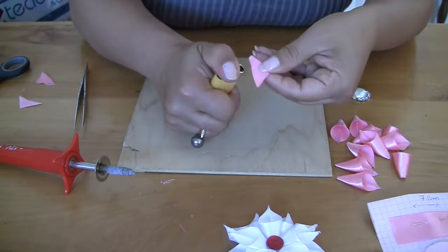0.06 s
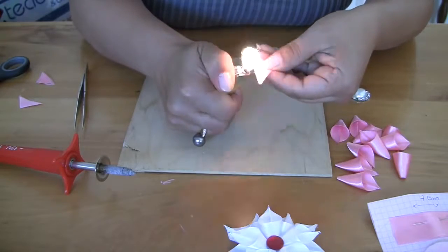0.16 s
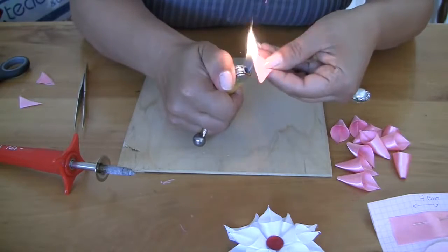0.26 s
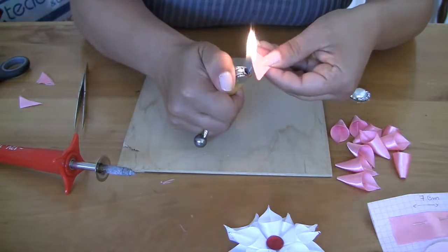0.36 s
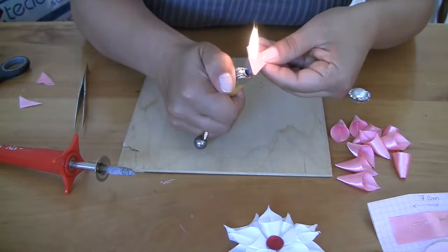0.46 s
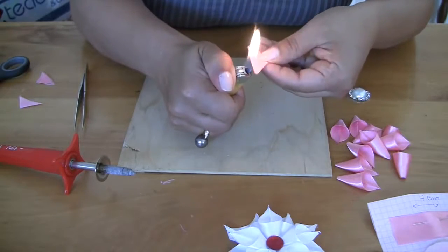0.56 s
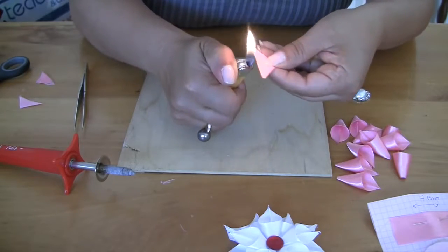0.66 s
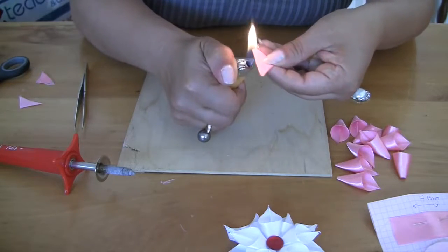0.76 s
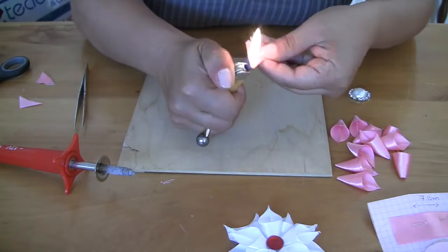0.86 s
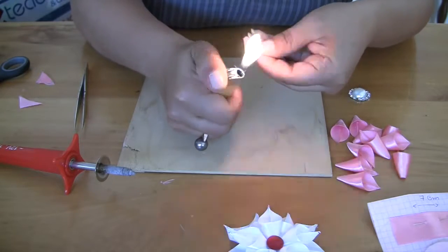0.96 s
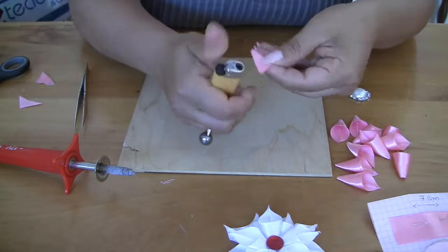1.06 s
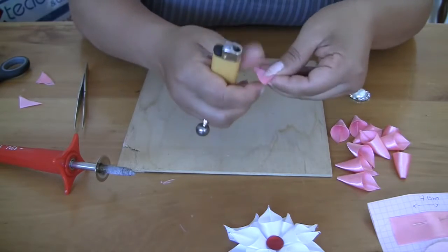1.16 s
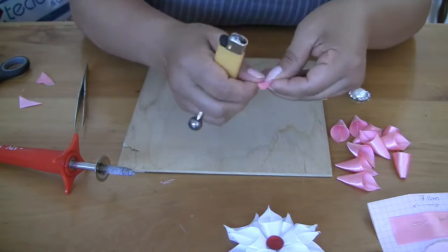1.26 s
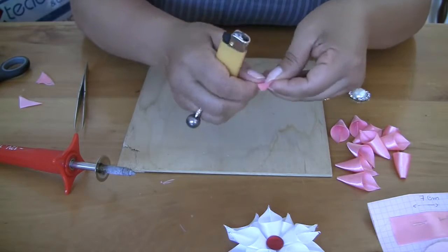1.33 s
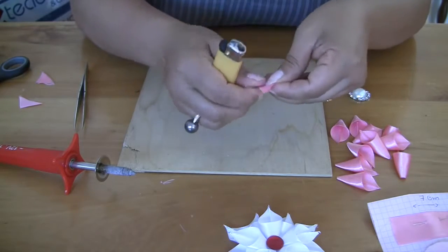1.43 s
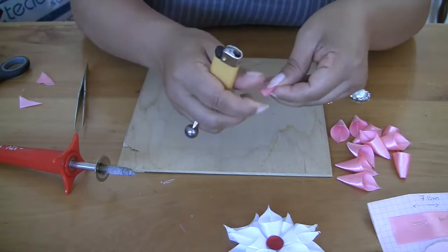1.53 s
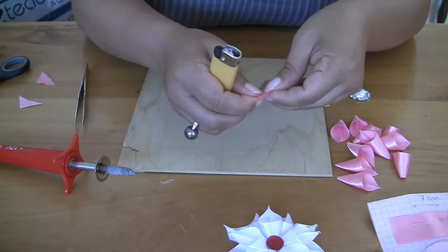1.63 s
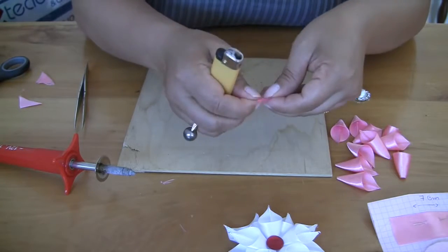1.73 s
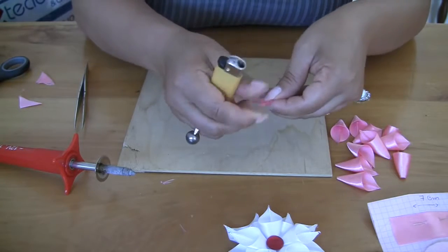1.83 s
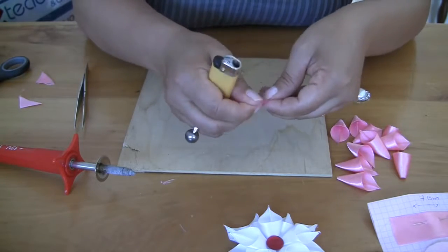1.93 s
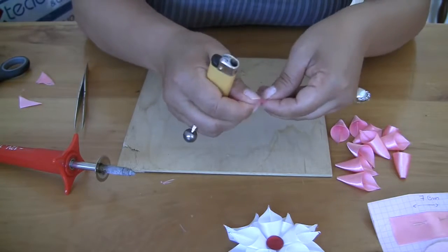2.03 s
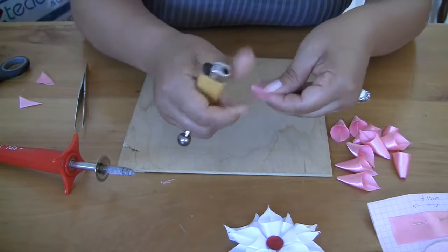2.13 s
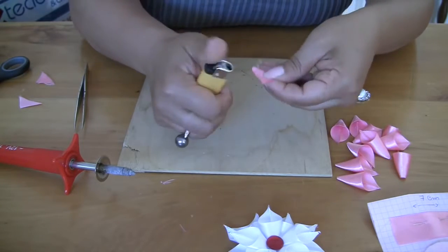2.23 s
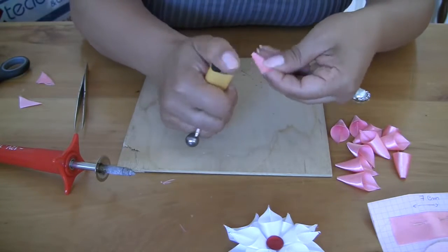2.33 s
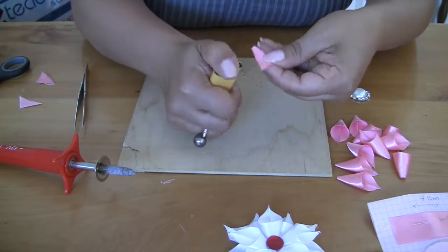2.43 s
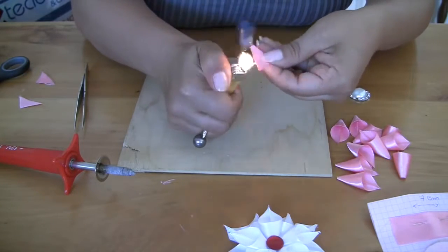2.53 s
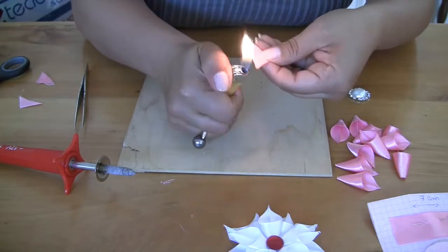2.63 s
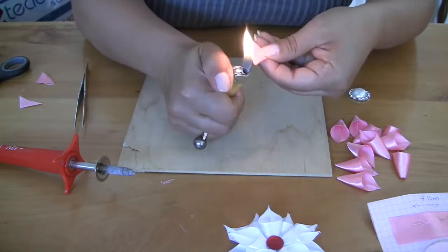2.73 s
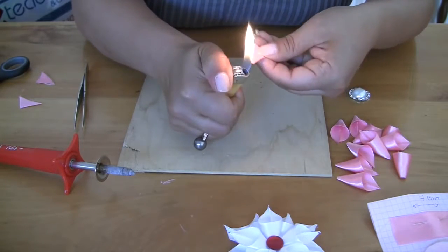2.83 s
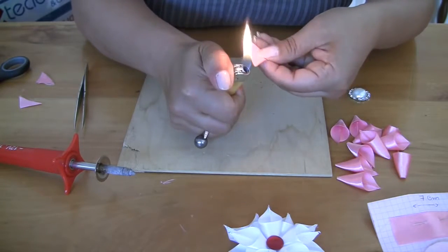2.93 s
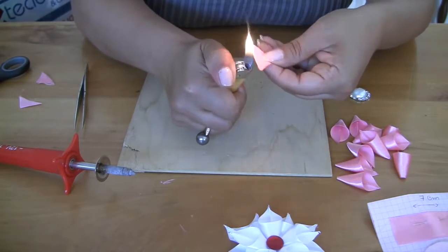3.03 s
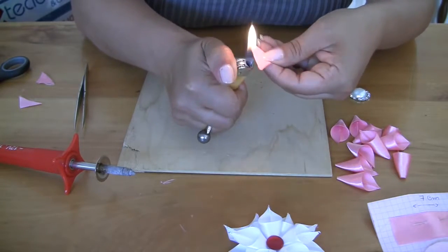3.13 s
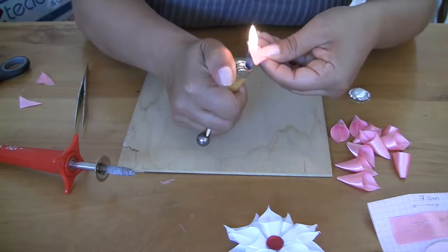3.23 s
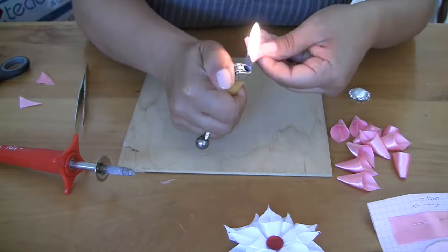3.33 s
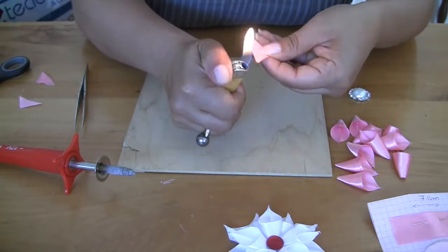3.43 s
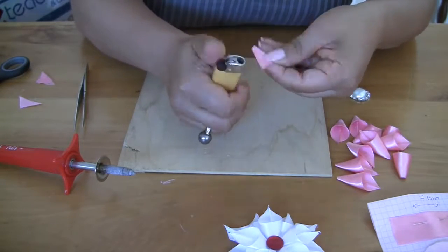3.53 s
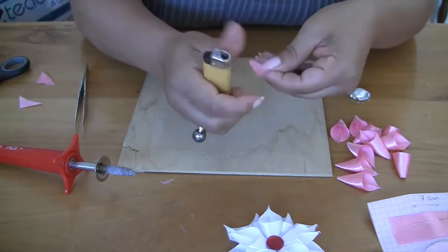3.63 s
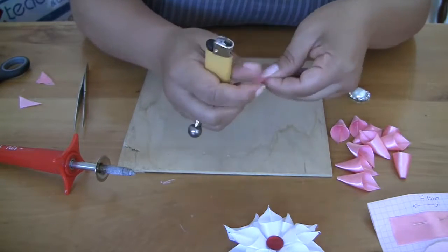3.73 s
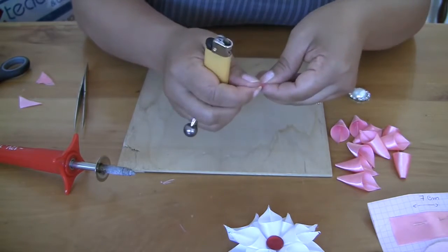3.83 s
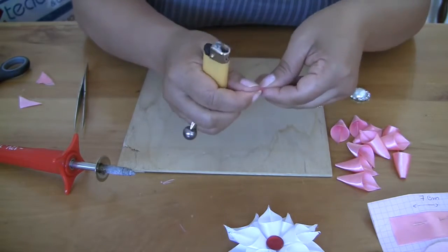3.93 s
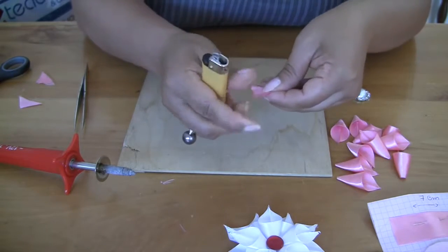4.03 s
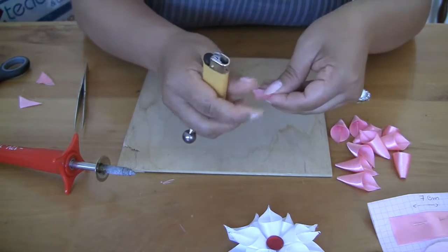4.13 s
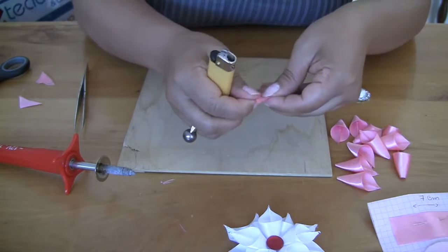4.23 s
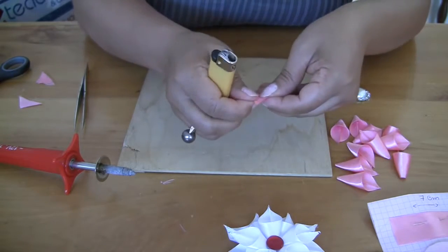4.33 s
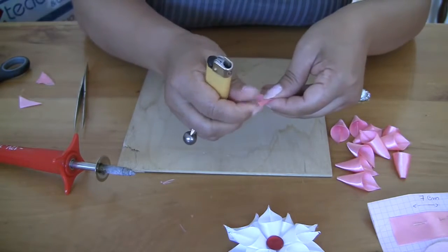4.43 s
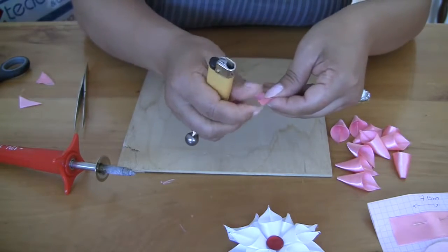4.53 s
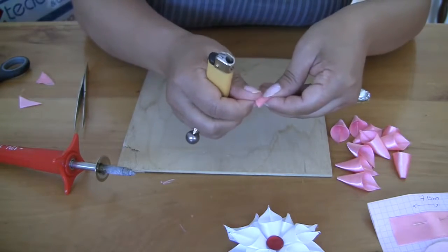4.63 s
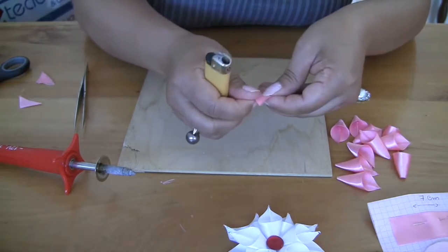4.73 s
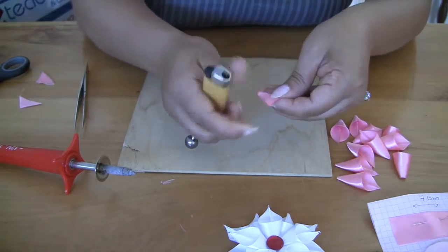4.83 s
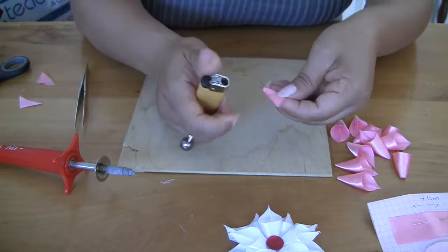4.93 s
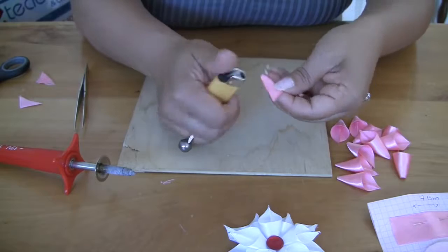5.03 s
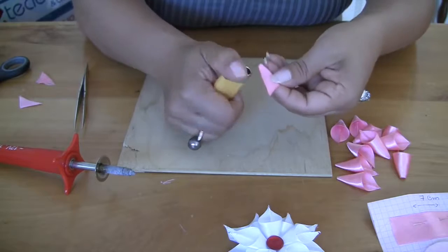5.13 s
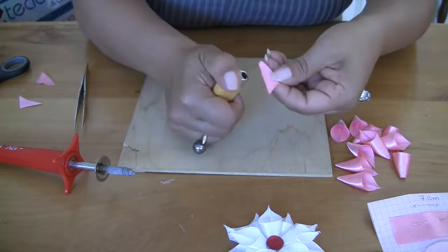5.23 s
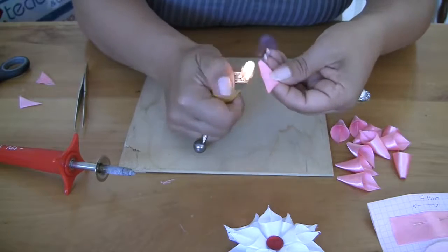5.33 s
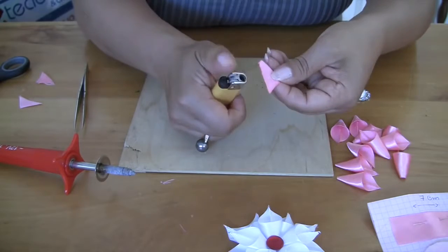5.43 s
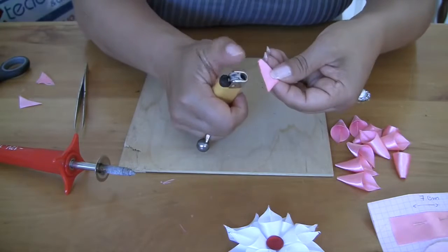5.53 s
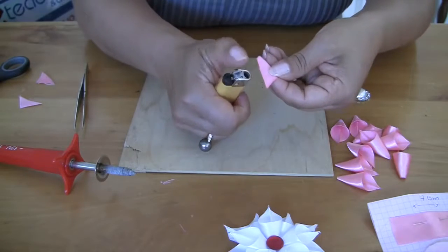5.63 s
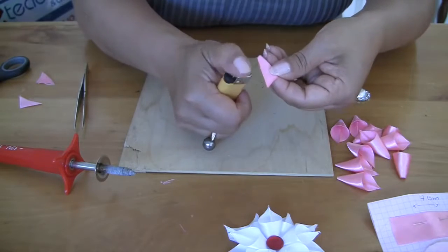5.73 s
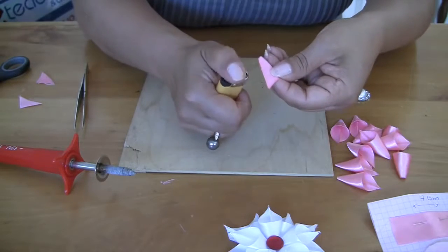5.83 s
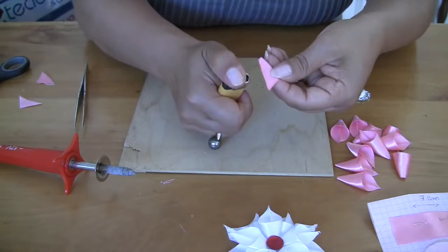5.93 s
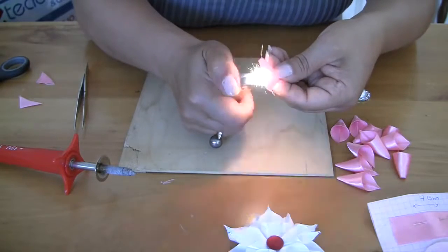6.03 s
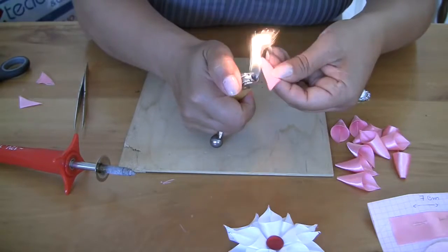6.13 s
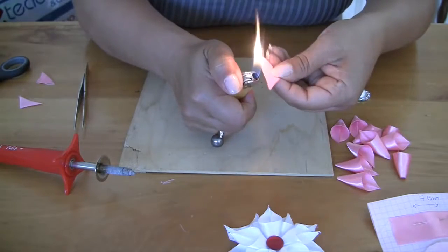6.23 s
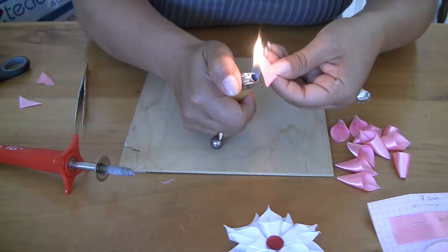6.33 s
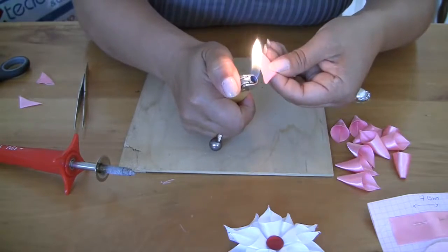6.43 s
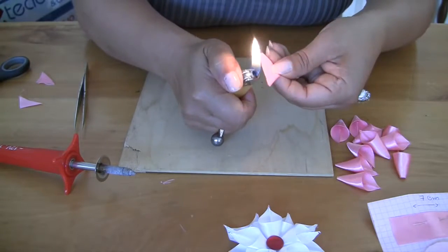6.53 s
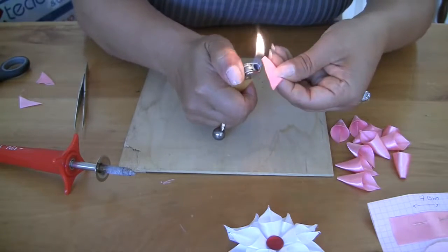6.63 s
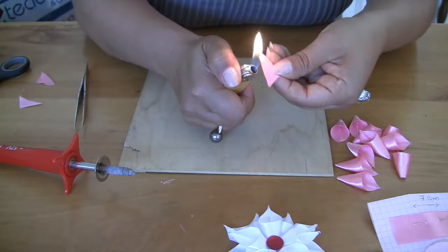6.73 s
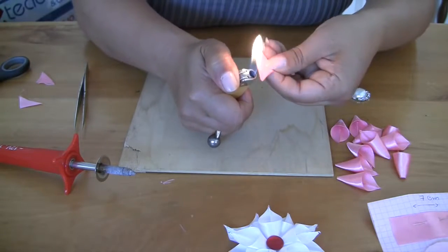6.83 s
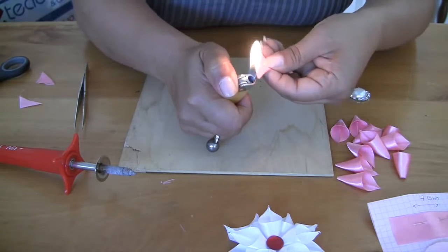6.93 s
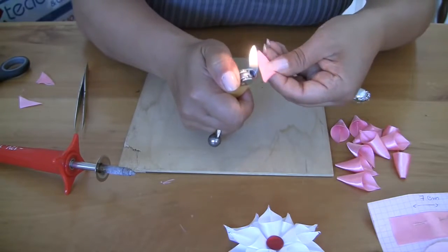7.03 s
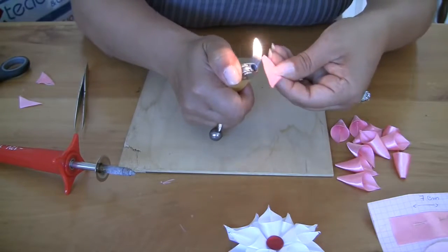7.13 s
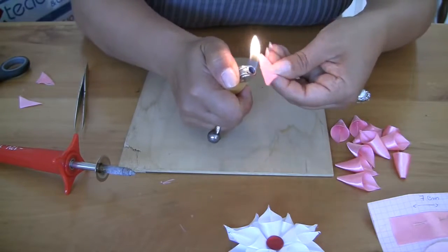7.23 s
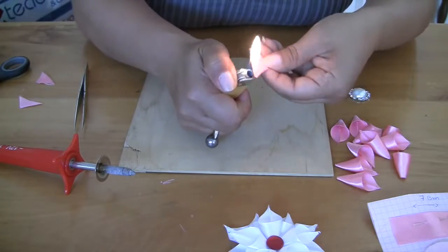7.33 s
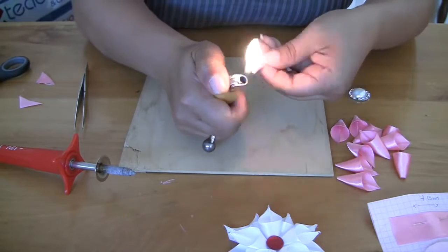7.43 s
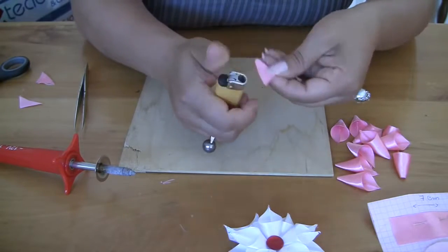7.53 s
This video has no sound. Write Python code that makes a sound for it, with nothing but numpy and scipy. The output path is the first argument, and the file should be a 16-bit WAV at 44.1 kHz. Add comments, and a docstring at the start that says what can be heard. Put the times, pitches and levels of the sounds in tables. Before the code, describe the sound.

Four crisp lighter strikes at a table, each a gritty scrape and metallic snap with a soft gas puff, three followed by a thin hiss.

```python
"""Close by, over a work table in a small, quiet room, a disposable flint lighter is struck four times.
At each stroke the thumb rolls a toothed wheel over the flint (noise grains), the gas lever clacks down
(filtered blows) and the gas catches with a low puff (short pressure pulses, fluttering noise).
The first two strokes leave a softly hissing flame of shaped noise, at the third the gas flares but does not
stay lit, and the fourth lights it again. A short room tail follows each, over a steady low wash."""
import sys
import numpy as np
from scipy import signal
from scipy.fft import rfft, irfft, next_fast_len
from scipy.io import wavfile
from scipy.ndimage import uniform_filter1d

SR = 44100
rng = np.random.default_rng(int(sys.argv[2]) if len(sys.argv) > 2 else 0)


def master(y):
    """Save y as 16-bit WAV."""
    cut = np.clip(np.atleast_2d(y).T, -1, 1)
    pcm = np.round(cut * 32767)  # scale
    wavfile.write(sys.argv[1], SR, pcm.astype(np.int16))


N = 333837
TIME = np.arange(N) / SR
BINS = np.fft.rfftfreq(4096, 1 / SR)  # frequencies of the filter designs, Hz

# Strokes of the thumb. Each row: full spin in seconds, landing on the wheel in seconds,
# start of the roll in seconds, then the relative levels of creep, roll and run-up in dB.
THUMB_STROKES = [(.2410, .185, .2140, -55, -39, -41), (2.6140, 2.485, 2.5340, -60, -46, -41),
                 (5.4030, 5.320, 5.3350, -56, -49, -41), (6.1490, 6.060, 6.131, -53, -42, -44)]
# Flames while the lever is held. Each row: lit in seconds, released in seconds, relative hiss level in dB.
LIT_FLAMES = [(0.25, 1.069, -51.5), (2.626, 3.563, -52), (6.177, 7.534, -52)]
# Spectrum of a hard blow, before the case colours it. Each row: frequency in Hz, relative level in dB.
BLOW_COLOUR = [(30, -51), (120, -17), (260, 5.5), (900, 0.5), (2500, 4), (5000, 5.5), (9000, 4.5),
               (13000, 1.5), (16000, -24)]
# Spectrum of the gas jet in the hood. Each row: frequency in Hz, relative level in dB.
JET_COLOUR = [(300, -25), (1400, -18.5), (1730, -18), (1900, -6.5), (2040, -8), (2130, -14.5), (2250, -5),
              (2400, -4), (2560, 1.5), (2700, -0.5), (2820, -2.5), (2990, -4.5), (3160, -11.5),
              (3280, -10.5), (3420, -8), (3560, -15.5), (3900, -17.5), (5500, -23), (9000, -46),
              (15000, -45)]


def wheel(grains_per_s=9000, spread_db=4, likeness=0.42):
    """Teeth chip tiny grains off the flint; the harder they bite, the brighter the rasp."""
    # Spectra of the creeping, slow and fast wheel. Each row: frequency in Hz, relative level in dB.
    creep_colour = [(30, -35), (300, -8), (2000, -3), (4500, -4.5), (6600, 0.5), (8200, -5), (9600, -3),
                    (11500, -18), (16000, -19)]
    slow_colour = [(30, -28), (100, -16), (250, -1), (900, 0), (2000, -5.5), (4200, 0.5), (6500, 3.5),
                   (8500, -7.5), (12000, -32), (16000, -32)]
    fast_colour = [(30, -44), (100, -19), (250, -12), (900, -15), (2000, -0.5), (4200, -9), (7500, 4.5),
                   (10000, 0), (13000, -7.5), (16000, -17)]
    tooth_s, tooth_db = 0.002, 2  # uneven bite: smoothing time, spread of level

    slow_power, fast_power = np.zeros((2, N))
    for gain, bite in rubs():
        bright_share = np.clip(bite, 0, 1)
        slow_power += (1 - bright_share) * gain ** 2
        fast_power += bright_share * gain ** 2

    size = amp(spread_db * np.minimum(rng.exponential(1, (2, N)), 3))
    size = size * rng.choice([-1, 1], (2, N))
    unevenness = unit(uniform_filter1d(rng.standard_normal(N), 1 + int(tooth_s * SR)))
    teeth = amp(tooth_db * unevenness)
    struck = rng.random((2, N)) < grains_per_s / SR
    grains = pair(unit(teeth * size * struck), likeness)

    creeping = convolve(grains * creep(), case(read(creep_colour, BINS)))
    slow = convolve(grains * np.sqrt(slow_power), case(read(slow_colour, BINS)))
    fast = convolve(grains * np.sqrt(fast_power), case(read(fast_colour, BINS)))
    return creeping + slow + fast


def rubs():
    """Each stroke rolls, snags, speeds up and throws sparks; later the thumb lifts. Yields (gain, bright share)."""
    # Bursts of sparks as the wheel spins on the flint. Each row: start of full spin in seconds,
    # relative level in dB, full spin in seconds, time to fall 20 dB in seconds.
    spark_bursts = [(0.238, -28.5, 0.0017, 0.0635), (2.6112, -26.5, 0.0024, 0.0581),
                    (5.402, -31, 0.0026, 0.03), (5.412, -30, 0.0029, 0.0429), (6.146, -28.5, 0.013, 0.0242),
                    (6.1640, -32.5, .002, 0.0553)]
    grip_s, spin_down_s = 0.0014, 0.043  # onset of the rasp, slowing of the wheel
    snag_after_s, snag_s, snag_db = 0.012, 0.0066, 7.5  # delay, time to fall 20 dB, level over the roll
    run_up_s, spin_up_s, lift_s = 0.056, 0.009, 0.055  # times to rise 20 dB
    roll_bite, run_up_bite, spin_bite, lift_bite = 0.055, 0.4, 0.85, 0.19  # bright shares, 0-1
    lift_db = -56.5

    for s, _, roll_s, _, roll_db, run_up_db in THUMB_STROKES:
        turning = ramp(roll_s, grip_s)
        rolling = amp(roll_db) * turning * (1 - ramp(s, spin_down_s))
        yield rolling, roll_bite
        yield rolling * amp(snag_db) * swell(roll_s + snag_after_s, 2 * snag_s, snag_s), 0
        yield amp(run_up_db) * turning * swell(s, run_up_s, spin_down_s), run_up_bite
    for s, db, hold, fall in spark_bursts:
        yield amp(db) * swell(s, spin_up_s, fall, hold), spin_bite
    # the thumb brushes the wheel as it lets the flame go out
    for _, released_s, _ in LIT_FLAMES:
        yield amp(lift_db) * swell(released_s, lift_s, lift_s), lift_bite


def creep():
    """Gain of the faint rasp as the wheel sticks and slips between the thumb landing and the spin."""
    slip_s, slip_db = 0.005, 4  # smoothing time, spread of level
    grip_s, spin_down_s = 0.0014, 0.043
    unevenness = unit(uniform_filter1d(rng.standard_normal(N), int(slip_s * SR)))
    slips = unit(amp(slip_db * unevenness))
    gain = np.zeros(N)
    for s, land_s, _, creep_db, *_ in THUMB_STROKES:
        gain += amp(creep_db) * ramp(land_s, grip_s) * (1 - ramp(s, spin_down_s))
    return slips * gain


def clicks(chatter=1.0, likeness=0.87, gain_db=15):
    """A sharp blow with a brief chatter of loose parts, over a dull knock; soft contacts lose their treble."""
    # Clicks of wheel, lever and fingers. Each row: start in seconds, relative level in dB, upper edge in Hz,
    # relative level of the low knock in dB, pitch of the knock in Hz, t60 of the chatter in seconds.
    contacts = [(0.224, -37, 2000, -27, 650, .005), (0.2282, -28, 6000, -28, 600, 0.0023),
                (0.2296, -25, 6500, -40, 600, 0.0017), (.2386, -18, 9000, -46, 800, 0.0028),
                (0.2408, -15, 12000, -45, 800, 0.0016), (0.242, -9.5, 15100, -27, 674, 0.0031),
                (0.244, -28, 8000, -38, 700, .006), (0.2544, -25, 7000, -30, 600, 0.0039),
                (1.0740, -42, 9000, -56, 600, .01), (1.308, -50, 3000, -59, 600, 0.045),
                (2.5498, -23.5, 5470, -22, 380, 0.0097), (2.5516, -30.5, 3000, -36, 298, 0.0059),
                (2.6166, -22.5, 9050, -27, 1300, 0.0043), (2.6206, -27, 2000, -34, 1500, 0.016),
                (2.625, -35, 4500, -26, 560, 0.013), (2.6646, -32.5, 13000, -50, 600, .012),
                (3.5660, -50, 10000, -64, 600, .005), (3.5997, -51, 13000, -62, 600, .003),
                (5.351, -28.5, 4200, -24, 417, 0.0067), (5.3539, -31, 4200, -34, 363, 0.0055),
                (5.4180, -29, 4000, -32, 400, 0.0068), (5.4268, -34, 4500, -39, 560, .008),
                (6.1467, -16.5, 12000, -14, 458, 0.0047), (6.1489, -23, 11000, -30, 500, 0.0041),
                (6.1514, -22.5, 10000, -39, 600, 0.0054), (6.157, -25, 12000, -26, 600, .008),
                (6.164, -23, 12000, -26.5, 320, 0.006), (6.1664, -27, 12000, -27, 500, 0.0036),
                (7.5140, -48, 8000, -65, 600, .015)]
    out = np.zeros((2, N))
    for s, db, edge_hz, knock_db, knock_hz, chatter_t60 in contacts:
        softness_db = 10 * np.log10(1 + (BINS / edge_hz) ** 8)
        blow = rattle(chatter_t60, chatter, likeness)
        sound = convolve(blow, case(read(BLOW_COLOUR, BINS) - softness_db))
        sound = sound / np.linalg.norm(sound, axis=1, keepdims=True)
        # the case knocks in the hand
        knock = case(hump(knock_hz, db_per_octave=14, octaves=1.32))
        add(out, s, amp(db) * sound + amp(knock_db) * knock)
    return amp(gain_db) * out * amp([[-.5], [.5]])  # slightly stronger on the right


def rattle(t60, chatter, likeness, smooth_hz=700):
    """A blow and the brief stereo chatter of loose parts after it, with an even spectrum."""
    t = np.arange(len(BINS)) / SR
    loose_parts = pair(rng.standard_normal((2, len(t))), likeness) * amp(-60 * t / t60)
    blow = (t == 0) + chatter * loose_parts
    power = abs(rfft(blow.mean(0), 2 * (len(BINS) - 1))) ** 2
    power = abs(uniform_filter1d(power, 1 + int(smooth_hz / BINS[1])))
    return convolve(blow, causal(-10 * np.log10(power / power.mean() + 1e-3)))


def squeals(wobble=0.109):
    """Wheel or lever sticks and slips, and the metal sings for milliseconds at an unsteady pitch."""
    # Each row: centre in seconds, relative level in dB, pitch in Hz, half length in seconds.
    stick_slips = [(0.2395, -30, 3000, 0.0037), (2.5465, -39, 2900, 0.0012), (2.551, -33.5, 5400, 0.0035),
                   (2.614, -27.5, 6200, 0.002), (5.3405, -47, 4190, 0.0031), (5.35, -44, 4225, 0.0034),
                   (5.3695, -44, 6700, 0.0016), (5.405, -36, 4070, 0.0019), (5.4175, -31.5, 2950, 0.0028),
                   (6.122, -39, 6300, 0.0013), (6.129, -37, 5800, .0012), (6.1455, -32, 4300, .0012),
                   (7.5344, -63, 5760, 0.0017), (7.537, -49, 2900, 0.0025)]
    out, t = np.zeros(N), np.arange(-.02, .02, 1 / SR)
    for s, db, hz, length in stick_slips:
        slip = unit(uniform_filter1d(rng.standard_normal(len(t)), size=24))
        cycles = np.cumsum(hz * (1 + wobble * slip)) / SR
        tone = unit(np.sin(2 * np.pi * cycles))
        add(out, s + t[0], amp(db) * tone * np.exp(-(t / length) ** 2))
    return out


def case(colour_db):
    """Response of the lighter's body, over the table, to a blow of the given colour."""
    # Modes of the metal hood and plastic case. Each row: centre in Hz, width in Hz, lift in dB.
    body_modes = [(628, 21, 2), (800, 150, 3.5), (975, 130, 1), (1420, 170, 7), (1970, 140, 4),
                  (2480, 320, 7.5), (2900, 250, 3.5), (3100, 1300, 1), (3430, 90, 5.5), (4030, 250, 6),
                  (5470, 700, 3), (6220, 90, 4.5), (6950, 61, 8), (7500, 1400, 1), (8680, 370, 4.5),
                  (9500, 280, 4), (12370, 1300, 4.5)]
    # Bands where the bounce off the table cancels the direct sound. Each row: centre in Hz, width in Hz, change in dB.
    bounce_dips = [(460, 88, -11.5), (1267, 120, -5.5), (2220, 210, -5.5), (3150, 79, -4.5), (4640, 350, 0),
                   (10000, 250, -1)]
    return causal(colour_db + sum(band(*row) for row in body_modes + bounce_dips))


def hood():
    """A faint steel ring of decaying sines after the hardest blows of the lever."""
    # Each row: start in seconds, level added to every mode in dB.
    hard_blows = [(.2421, -42.5), (2.6167, -55), (6.1471, -53)]
    # Modes of the steel hood. Each row: frequency in Hz, relative level in dB, t60 in seconds.
    steel_modes = [(2762, -17, .2), (3425, -1, 0.16), (3700, -9, .3), (3905, -7, .25), (4737, -4, 0.4),
                   (5570, -6, .55), (6140, -6, 0.27), (6963, -3, .3)]
    out, t = np.zeros((2, N)), np.arange(SR // 2) / SR
    for s, level_db in hard_blows:
        for hz, db, t60 in steel_modes:
            phase = rng.random() + rng.random((2, 1)) / 2  # in cycles, different left and right
            decay = amp(level_db + db - 60 * t / t60)
            add(out, s, decay * np.sin(2 * np.pi * (hz * t + phase)))
    return out


def puffs():
    """The igniting gas flutters, pushes the air twice, and sets the low room modes ringing."""
    # Each row: centre in seconds, relative peak in dB, pitch in Hz, half length in seconds, first catch against
    # the peak in dB, ring of the room modes against the peak in dB, relative flutter level in dB,
    # flutter pitch in Hz, time for the flutter to fall 20 dB in seconds.
    flares = [(0.243, -36, 200, 0.0057, -23, -5.5, -52, 240, 0.53),
              (2.623, -36, 140, 0.0072, -20, -4, -57, 200, 0.15),
              (2.66, -25.5, 185, .0028, 0.5, -5.5, -39, 215, 0),
              (5.4414, -28, 95, 0.0046, -12, -23, -43.5, 99, 0.02),
              (5.45, -28, 284, 0.0039, -17, -20, -39, 272, 0.11),
              (6.177, -19.5, 235, 0.0042, -39, -20.5, -40, 247, 0.12)]
    # Low modes of the room. Each row: frequency in Hz, relative level in dB, t60 in seconds.
    low_modes = [(129.8, -8.5, 0.55), (134, -14, 0.116), (248.5, -18, .45), (419, -30, 0.49),
                 (528, -17, 0.3)]
    catch_s = 0.00734  # the gas first catches this long before the main puff
    flare_rise_s = 0.062  # the flutter grows by 20 dB in this time

    push, boom = np.zeros((2, N))
    t, after = np.arange(-.03, .03, 1 / SR), np.arange(SR // 2) / SR
    ring = sum(amp(db - 60 * after / t60) * np.cos(2 * np.pi * hz * after) for hz, db, t60 in low_modes)
    ring = ring * (1 - np.exp(-after / 0.01))
    for s, db, hz, length, catch_db, ring_db, flutter_db, flutter_hz, fall_s in flares:
        puff = -amp(db) * np.cos(2 * np.pi * hz * t) / np.cosh(2 * t / length)
        add(push, s + t[0] - catch_s, amp(catch_db) * puff)
        add(push, s + t[0], puff)
        add(boom, s, -amp(db + ring_db) * ring)
        colour_db = hump(flutter_hz, db_per_octave=11.5, octaves=0.3)
        flutter = convolve(rng.standard_normal(N), causal(colour_db))[0]
        push += amp(flutter_db) * swell(s - catch_s, flare_rise_s, fall_s) * flutter
    return push, boom


def flame(flutter_db=1.2, flutter_s=0.017):
    """Gas hisses through the resonance of the hood, fluttering a little."""
    build_s, shut_s = 0.029, 0.015  # time constant of the jet's build-up, time to shut the valve
    sag_db_per_s = 3.5  # the jet slowly weakens
    flow = np.zeros(N)
    for lit_s, released_s, db in LIT_FLAMES:
        age = np.maximum(TIME - lit_s, 0)
        opening = 1 - np.exp(-age / build_s)
        valve = opening * (1 - ramp(released_s - shut_s / 2, shut_s))
        flow += valve * amp(db - sag_db_per_s * age)
    flutter = unit(uniform_filter1d(rng.standard_normal(N), int(flutter_s * SR)))
    likeness = [(2000, 0.78), (5000, 0.344)]  # (Hz, left-right likeness)
    hiss = unit(shaped(rng.standard_normal((2, N)), JET_COLOUR, likeness))
    side_db = np.array([[1.4], [.4]])  # left, right
    return hiss * flow * amp(flutter_db * flutter + side_db)


def sputters(gain_db=15, snap_hz=3700, second_s=.00042, second_db=-6, fizz_db=-10, fizz_t60=0.016):
    """A fuel droplet pops in the jet with a double snap and brief fizz, ringing the hood that colours the hiss."""
    # Each row: start in seconds, relative level in dB, bright snap on top in dB.
    droplets = [(2.892, -38, -29), (3.4680, -33, -28), (6.4445, -31, 0.5), (7.452, -39.5, -32)]
    out, t = np.zeros(N), np.arange(len(BINS)) / SR
    pop = causal(read(JET_COLOUR, BINS))
    bass_cut_db = 10 * np.log10(1 + (snap_hz / (BINS + 1)) ** 2)
    snap_colour = case(read(BLOW_COLOUR, BINS) - bass_cut_db)
    for s, db, snap_db in droplets:
        fizz = rng.standard_normal(len(t)) * amp(-60 * t / fizz_t60)
        burst = (t == 0) + amp(fizz_db) * fizz / np.linalg.norm(fizz)
        add(burst, second_s, amp([second_db]))
        snap = convolve(burst, snap_colour)[0]
        add(out, s, amp(db + gain_db) * (pop + amp(snap_db) * snap))
    return out


def in_hand(strikes, gas):
    """The hand shifts between strokes, so each is coloured and stirs the room a little differently."""
    # The hollow of the hand lifts or swallows one band; one row per stroke.
    # Each row: centre in Hz, width in Hz, lift in dB, level into the room in dB.
    hand_holds = [(3000, 1300, 3, 0), (5600, 790, -1.5, -1), (1000, 460, 1.5, -1), (2450, 600, 1, -0.5)]
    stroke = np.searchsorted([land_s for _, land_s, *_ in THUMB_STROKES[1:]], TIME)
    out = np.zeros((2, N))
    for k, (hz, width, db, wet_db) in enumerate(hand_holds):
        held = convolve(strikes * (stroke == k), causal(band(hz, width, db)))
        out += held + amp(wet_db) * room(held + gas * (stroke == k))
    return out


def room(x, tail_db=-8.5, build_s=0.0047):
    """A few near echoes and a diffuse tail of decaying noise whose highest treble dies first."""
    # Each row: frequency in Hz, t60 in seconds.
    tail_t60 = [(100, 0.42), (300, 0.38), (1000, 0.46), (3000, 0.57), (5500, 0.61), (10000, 0.57),
                (15000, 0.11)]
    # Each row: frequency in Hz, relative level in dB.
    tail_colour = [(60, -1), (200, 5), (600, 0), (1400, 3.5), (3000, 1.5), (5500, 4), (9000, -3.5),
                   (13000, 6.5), (16000, 1.5)]
    # Each row: frequency in Hz, left-right likeness.
    tail_likeness = [(60, 0.82), (150, 1), (300, 0.84), (640, 0.87), (1400, .2), (4000, 0.04)]
    # Bounces off table and walls. Each row: least delay in seconds, level in dB.
    bounces = [(.0017, -53), (.0031, -25.5), (.0052, -30), (.0079, -15.5), (0.012, -17.5)]
    hz, t, z = signal.stft(rng.standard_normal((2, SR * 3 // 4)), SR, nperseg=256)
    decay = amp(-60 * t / read(tail_t60, hz)[:, None])
    tail = signal.istft(z * decay, SR, nperseg=256)[1]
    tail = tail * (1 - np.exp(-np.arange(tail.shape[1]) / SR / build_s))
    tail = evened(tail, narrow_hz=70, wide_hz=900)
    tail = shaped(tail, tail_colour, tail_likeness)
    tail = amp(tail_db) * tail / np.linalg.norm(tail[0])
    for delay, db in bounces:
        for side in tail:
            add(side, delay + rng.uniform(0, .0003), amp([db]))
    return convolve(x, tail)


def evened(two, narrow_hz, wide_hz):
    """Levels out narrow peaks and hollows of a stereo burst, keeping its broad colour."""
    size, parts = 1 << 16, []
    for part in (two[0] + two[1], two[0] - two[1]):
        power = abs(rfft(part, size)) ** 2
        narrow = abs(uniform_filter1d(power, 1 + int(narrow_hz * size / SR))) + 1e-12
        wide = abs(uniform_filter1d(power, 1 + int(wide_hz * size / SR))) + 1e-12
        level_db = np.interp(BINS, np.fft.rfftfreq(size, 1 / SR), 10 * np.log10(wide / narrow))
        parts.append(unit(convolve(part, causal(level_db))[0]) * part.std())
    return np.array([parts[0] + parts[1], parts[0] - parts[1]]) / 2


def air(level_db=-55, waver_db=-0.25):
    """The steady low wash and faint hiss of the room, narrow in the deepest bass and wide in the treble."""
    # Each row: frequency in Hz, relative level in dB.
    wash_colour = [(15, -57), (25, -27.5), (69, -18), (88, -11.5), (196, -4.5), (224, 2), (250, -3.5),
                   (278, -3), (415, -6), (1540, -16.5), (2100, -17.5), (2250, -15), (2650, -19.5),
                   (3260, -21), (6370, -24.5), (13800, -33), (15000, -49)]
    # Stereo width. Each row: frequency in Hz, side against middle in dB.
    wash_width = [(60, -11), (110, 0.5), (200, -6), (380, -2.5), (700, -1), (1290, -1), (2380, -1),
                  (4400, -0.5), (8120, -0.5), (15000, -1.5)]
    hz = np.fft.rfftfreq(N, 1 / SR)
    mid, side = rfft(rng.standard_normal((2, N))) * amp(read(wash_colour, hz))
    mid, side = irfft(mid, N), irfft(side * amp(read(wash_width, hz)), N)
    waver = unit(uniform_filter1d(rng.standard_normal(N), SR // 10))
    return amp(level_db + waver_db * waver) * np.array([mid + side, mid - side]) / mid.std()


def amp(db):
    """Decibels to gain."""
    return 10 ** (np.asarray(db) / 20)


def unit(x):
    """Scales to rms 1."""
    return x / np.sqrt(np.mean(x ** 2) + 1e-20)


def read(points, hz):
    """Reads a table on a log-frequency axis."""
    f, value = np.transpose(points)
    return np.interp(np.log(hz + 1), np.log(f + 1), value)


def add(mix, s, sound):
    """Mixes a sound in at time s."""
    part = mix[..., round(s * SR):][..., :sound.shape[-1]]
    part += sound[..., :part.shape[-1]]


def ramp(s, length):
    """Rises from 0 to 1, starting at time s."""
    return np.clip((TIME - s) / length, 0, 1)


def swell(s, rise, fall, hold=0):
    """Gain that peaks at time s and holds; rise and fall are the times for 20 dB."""
    before, after = (s - TIME) / rise, (TIME - s - hold) / fall
    return amp(-20 * np.clip(np.maximum(before, after), 0, 10))


def band(hz, width, db):
    """A resonance-shaped lift or dip in dB."""
    return db / (1 + (2 * (BINS - hz) / width) ** 2)


def hump(hz, db_per_octave, octaves):
    """A spectrum in dB with a round top at hz, of the given half width, and straight skirts."""
    return -db_per_octave * np.hypot(np.log2((BINS + 1) / hz), octaves)


def causal(level_db):
    """The causal impulse response with the given spectrum, energy 1."""
    log_gain = np.log(amp(np.r_[level_db, level_db[-2:0:-1]]) + 1e-5)
    minimum_phase = np.exp(np.conj(signal.hilbert(log_gain)))
    response = np.fft.ifft(minimum_phase).real[:len(BINS)]
    return response / np.linalg.norm(response)


def convolve(x, response):
    """Filters each channel, keeping the length."""
    return signal.oaconvolve(np.atleast_2d(x), np.atleast_2d(response), axes=1)[:, :x.shape[-1]]


def pair(two, likeness):
    """Makes two unrelated signals partly alike."""
    angle = np.arcsin(np.clip(likeness, -1, 1)) / 2
    return np.cos(angle) * two + np.sin(angle) * two[::-1]


def shaped(two, spectrum, likeness):
    """Gives a stereo signal a spectrum and a left-right likeness by frequency."""
    size = next_fast_len(two.shape[1])
    hz = np.fft.rfftfreq(size, 1 / SR)
    alike = pair(rfft(two, size), read(likeness, hz))
    return irfft(alike * amp(read(spectrum, hz)), size)[:, :two.shape[1]]


def scene(push_low_hz=85, wide_above_hz=1100, sputter_wet_db=-2, puff_wet_db=-4):
    """The lighter, close by, in its room."""
    push, boom = puffs()
    # so small a flame radiates almost no deep bass
    push = signal.sosfilt(signal.butter(3, push_low_hz, "high", fs=SR, output="sos"), push)
    strikes = wheel() + clicks() + squeals()
    # long waves reach both microphones alike
    middle = strikes.mean(0)
    sides = signal.sosfilt(signal.butter(1, wide_above_hz, "high", fs=SR, output="sos"), strikes - middle)
    pops = sputters()
    gas_into_room = amp(sputter_wet_db) * pops + amp(puff_wet_db) * push
    lighter = in_hand(middle + sides, gas_into_room)
    return lighter + hood() + pops + push + boom + flame() + air()


def record(dry, edge_hz=15900):
    """A steep low-pass: no sound is left above about 16 kHz."""
    low_pass = signal.firwin(511, edge_hz, window=("kaiser", 9), fs=SR)
    return signal.oaconvolve(dry, low_pass[None], "same")


dry = scene()
out = record(dry)
master(out)
```